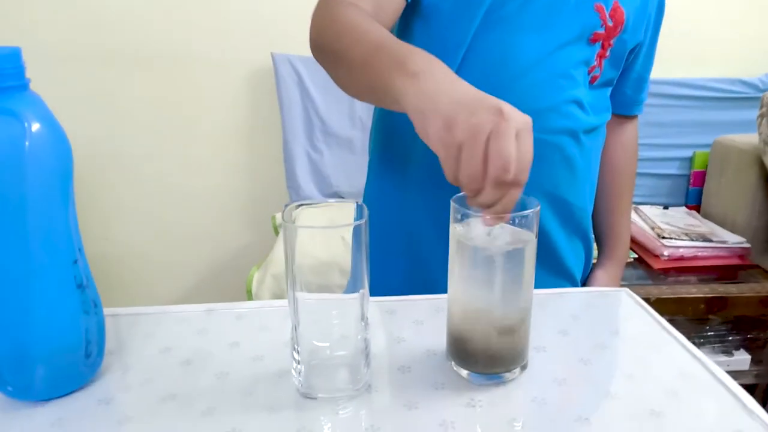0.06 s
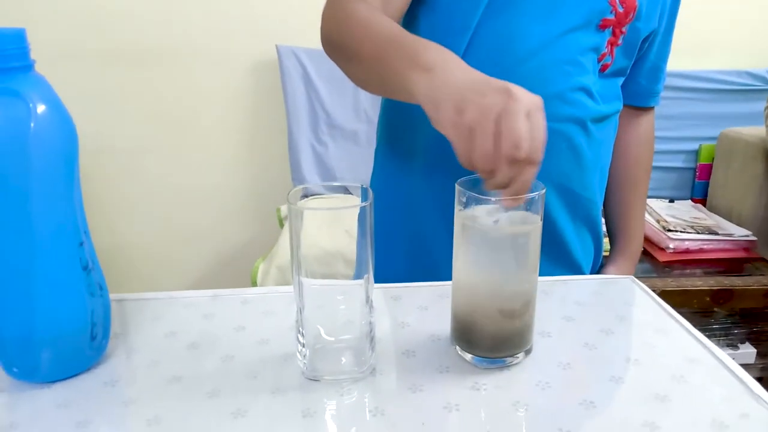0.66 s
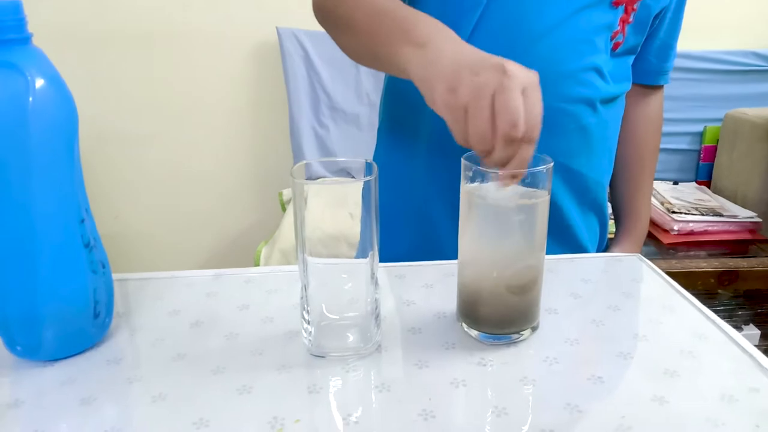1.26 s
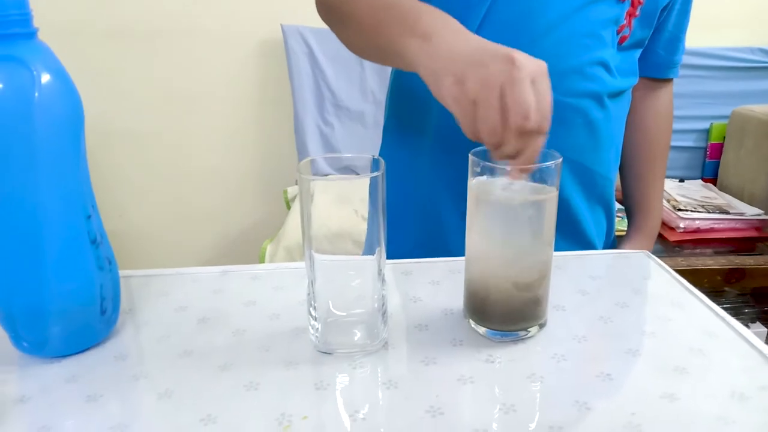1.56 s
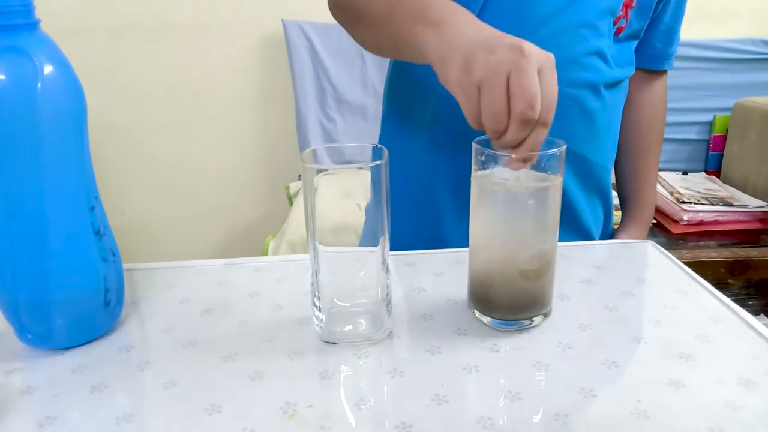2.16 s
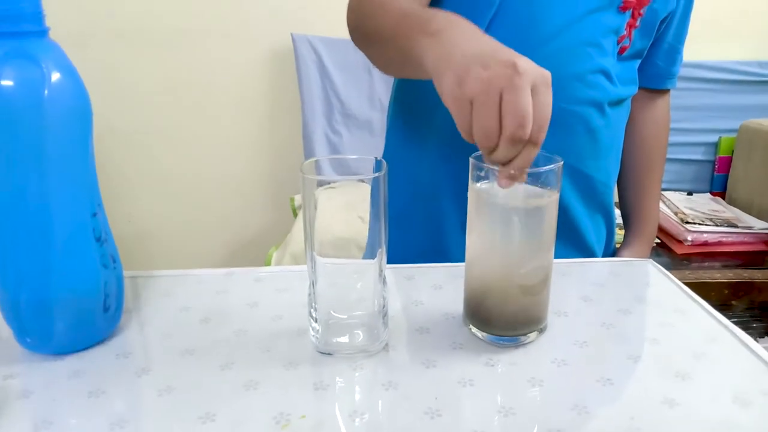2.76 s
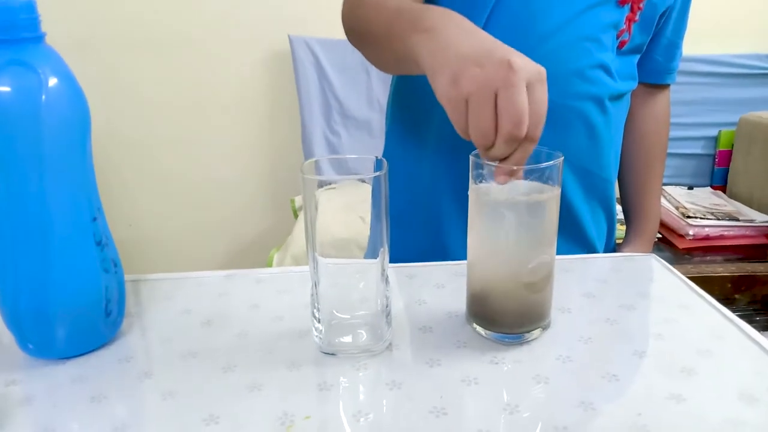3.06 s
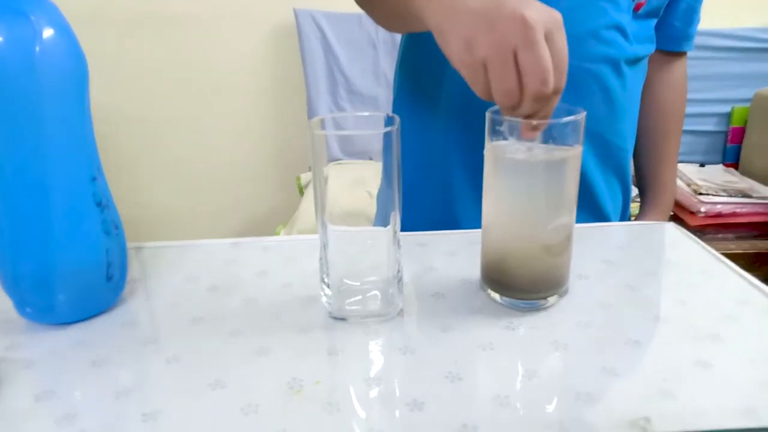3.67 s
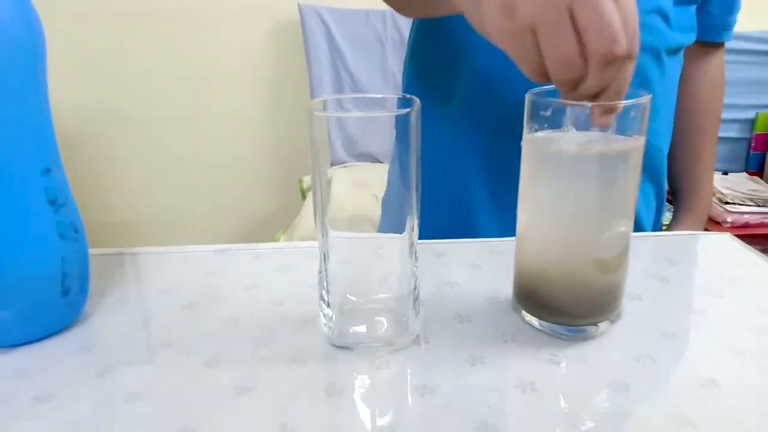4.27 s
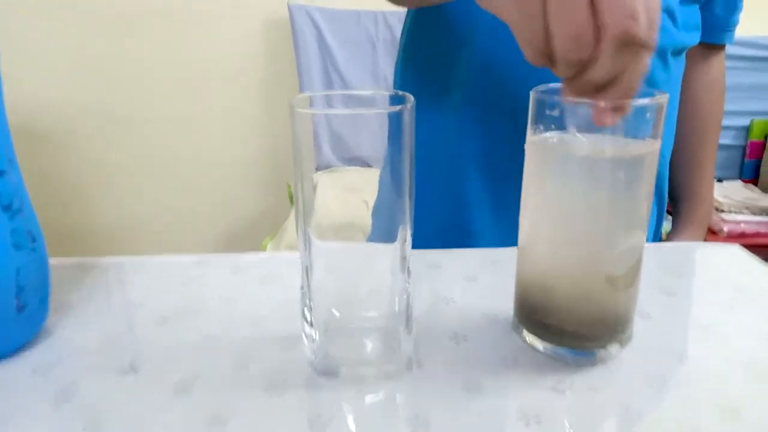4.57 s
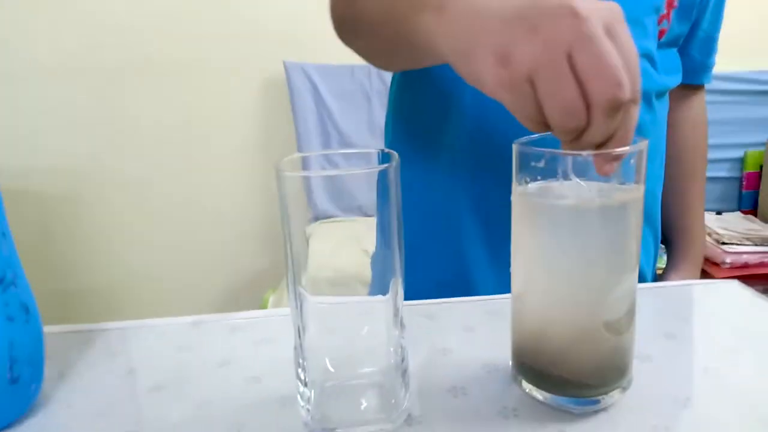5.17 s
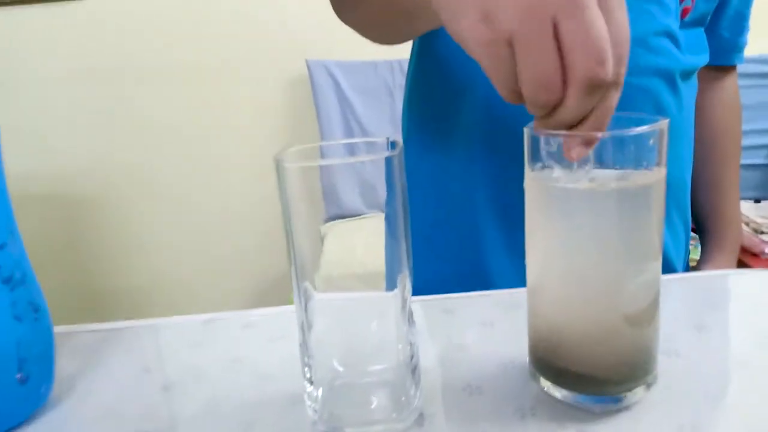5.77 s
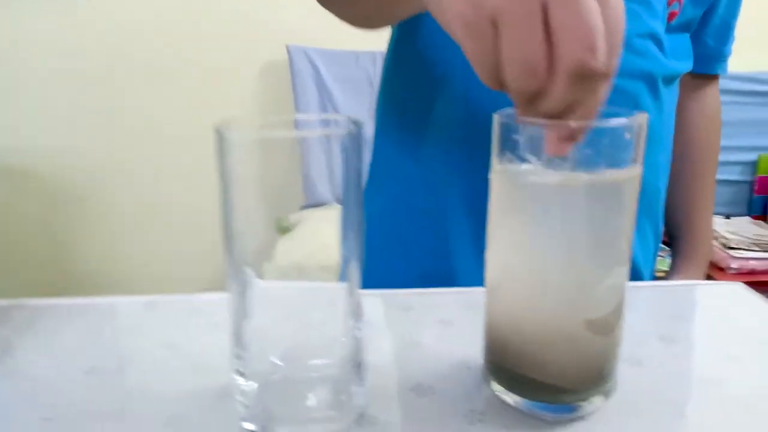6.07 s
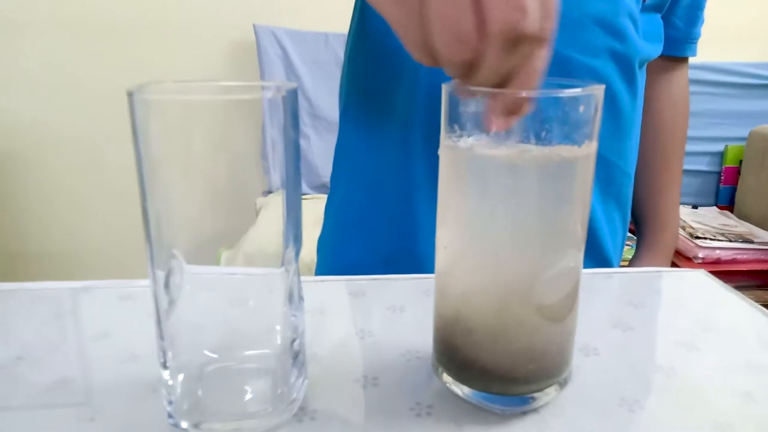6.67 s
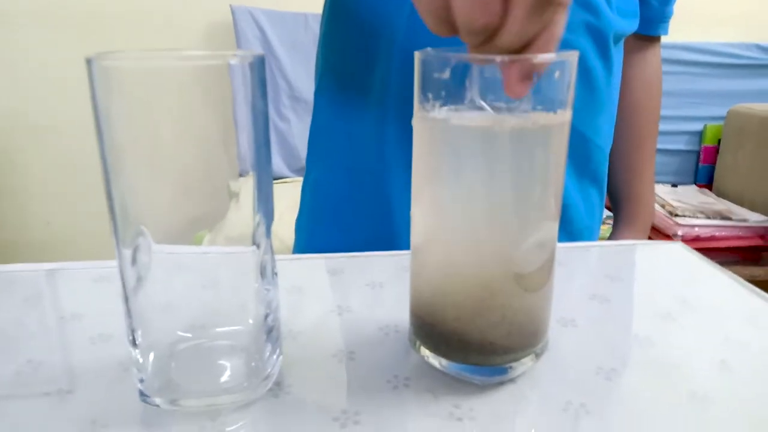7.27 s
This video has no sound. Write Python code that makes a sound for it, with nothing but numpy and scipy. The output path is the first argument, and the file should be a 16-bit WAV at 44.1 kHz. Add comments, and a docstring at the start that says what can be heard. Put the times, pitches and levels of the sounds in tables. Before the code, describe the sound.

Gritty crunches and light, irregular clinks come from a rod swirling sandy water in a glass while a fan hums steadily in a small room. Early on, the rod digs twice through the sand and something hard clacks twice. Midway, the nearby hand-held phone picks up dull bumps, the last one loud. The taps on the glass then grow busier over faint sloshing, and a third clack sounds near the end.

```python
"""Gritty crunches and clinks: a rod stirs sand and water in a drinking glass, close to a hand-held phone.
Friction on the grains gives trains of tiny impulses; these and the rod's taps excite the glass's modes.
The water sloshes softly. Something hard clacks three times, ringing a panel and a latch in a small room.
Short pulses give dull bumps and small taps: handling thumps on the phone, a faint tick and a soft knock.
A fan hums behind it all."""
import sys
import numpy as np
from scipy import signal
from scipy.fft import rfft, irfft
from scipy.io import wavfile
from scipy.ndimage import uniform_filter1d

SR = 44100
rng = np.random.default_rng(int(sys.argv[2]) if len(sys.argv) > 2 else 0)


def output_pcm(signal):
    """Save a mono or channel-first signal as 16-bit PCM at the path in sys.argv[1].

    Samples are clipped to [-1, 1] before scaling.
    """
    pcm = np.clip(np.atleast_2d(signal).T, -1, 1) * 32767
    wavfile.write(sys.argv[1], SR, np.round(pcm).astype(np.int16))


N = 327222
T = np.arange(N) / SR

# Levels are relative: each source applies its own gain. t60_s is the time to decay by 60 dB.
# spectrum of the fan's air noise: frequency_hz, density_db
FAN_SPECTRUM = [(25, -15), (50, -16), (85, 2), (140, 2), (230, 0.5), (330, -4), (500, -6), (750, -13),
                (1500, -13.5), (2800, -15.5), (5000, -27.5), (9000, -33), (15000, -36)]
# harmonics of the fan's motor: pitch_hz, level_db
MOTOR_HARMONICS = [(100.2, -57), (200.4, -80.5), (300, -66)]
# dull bumps and small taps: start_s, level_db, brightness_hz, creak_length_s, creak_db, thud_db
BUMPS_AND_TAPS = [(2.616, -36.5, 1200, 0.0055, 2, -25), (2.784, -29, 1500, 0.0056, -5, -16),
                  (3.772, -17, 760, 0.031, -9.5, -21), (3.81, -26.5, 497, .005, -12, -26),
                  (3.821, -21.5, 250, 0.012, -8, -20), (4.2363, -4.5, 730, 0.029, -1.5, -18),
                  (5.367, -31, 260, 0.0088, 5.5, -37)]
# impacts that form the three clacks: start_s, level_db, slide_s, corner_hz, latch_db, rattle_db
CLACK_IMPACTS = [(1.7293, -32.5, 0.016, 7000, -4, -13), (1.7737, -22.5, 0.0015, 2100, -20, -31),
                 (2.040, -29.5, 0.011, 7000, -3.5, -11), (2.0928, -18, 0.0011, 5400, -24, -12),
                 (6.002, -38.5, 0.019, 9000, -1, -7), (6.016, -35.5, 0.0022, 12000, -5, -10),
                 (6.0464, -26, 0.0051, 12000, -11, -32)]
# spectrum of a clack's knock: frequency_hz, density_db
CLACK_SPECTRUM = [(80, -15), (170, -9.5), (235, 0), (320, -4.5), (550, 5.5), (680, -9), (800, 0.5),
                  (1050, 1.5), (1600, -2.5), (2200, -4), (3100, -9.5), (4800, -12.5), (6200, -16.5),
                  (8000, -16), (15000, -35)]
# modes of the struck panel: pitch_hz, level_db, t60_s
PANEL_MODES = [(228.7, -14, 0.29), (475.6, -10.5, 0.12), (583, -9, 0.13), (835, 3.5, 0.019),
               (1065, 1.5, 0.044), (1500, -7, 0.061)]
# modes of the metal latch: pitch_hz, level_db, t60_s
LATCH_MODES = [(3086, 1.5, 0.031), (6170, -4, 0.027), (6360, -7, 0.038), (9600, -11, 0.0066),
               (13500, -2.5, 0.0037)]
# envelope of the swirling water: time_s, slosh_db, glass_tone_db
SWIRL_LEVELS = [(0, -53, -72), (.35, -52.5, -54), (.8, -57, -58.5), (1.1, -52, -63), (1.45, -57.5, -66),
                (2.4, -58.5, -67.5), (3.0, -60, -64.5), (3.8, -61, -72), (4.35, -58, -62),
                (4.85, -65.5, -66), (5.2, -61.5, -69), (5.9, -63.5, -62), (6.7, -70, -68),
                (7.4, -59, -67.5)]
# spectrum of the slosh: frequency_hz, density_db
SLOSH_SPECTRUM = [(200, -12), (380, -7.5), (570, 8.5), (700, -8), (900, 4), (1200, -9), (1800, 5),
                  (3000, -12.5), (6000, -10.5), (15000, -41)]
# lowest mode of the filled glass: pitch_hz, level_db, t60_s
LOWEST_MODE = (991, 0, 0.19)
# long-ringing mode of the rim: pitch_hz, level_db, t60_s
RIM_MODE = (2772, 0, 0.25)
# wall modes of the filled glass: pitch_hz, level_db, t60_s
WALL_MODES = [(1718, -15, 0.12), (2030, -12, 0.05), (2360, -4.5, 0.061), (2451, -10, 0.079),
              (2480, 1, 0.036), (2584, -6.5, 0.07), (2656, -4.5, 0.026), (2825, -11.5, 0.028),
              (3240, -0.5, 0.02), (3830, -10, 0.12), (5030, -10, 0.047), (5220, -11.5, 0.069),
              (5950, -20.5, 0.071), (7000, -9, 0.052), (7250, -8.5, 0.06), (8000, -25, 0.15),
              (8280, -9.5, 0.057), (9550, -22, 0.037), (11400, -18, 0.034), (11400, -30, .06),
              (13500, -21, 0.058)]
# quick digs through the sand: start_s, peak_s, level_db, swell_db, t60_s, rod_db, squeak_hz, squeak_db
SAND_SWISHES = [(.47, 0.518, -32.5, 9.5, 0.27, -8, 5000, -8), (0.773, 0.799, -35, 12, .25, 1, 14100, 2)]
# spectrum of rushing sand: frequency_hz, density_db
SWISH_SPECTRUM = [(300, -28), (900, 1), (1400, -3), (1900, -5), (3000, -15), (5000, 0), (8000, 4.5),
                  (12000, 1), (16000, 1.5)]
# modes of the scraping rod: pitch_hz, level_db, t60_s
ROD_MODES = [(950, -6, 0.026), (1610, 2.5, 0.022), (1830, -2, 0.026), (2080, -1.5, 0.06), (2780, -11, 0.18),
             (4980, 1.5, 0.04)]
# spectrum of cracking grit: frequency_hz, density_db
GRIT_SPECTRUM = [(300, 3.5), (900, -5.5), (1800, -5), (3000, -2.5), (5000, -1), (8000, -4.5),
                 (12000, -10.5), (16000, -4.5)]
# drags of the rod along the wall: start_s, length_s, grit_db, rub_db
ROD_STROKES = [(-.03, 0.038, -59, -41), (0.072, 0.23, -60.5, -46), (0.352, .05, -62, -47.5),
               (0.444, 0.46, -60, -45), (0.742, 0.34, -62.5, -48), (1.02, 0.19, -62, -45.5),
               (1.218, .1, -56, -65), (1.416, 0.23, -66.5, -54), (1.812, 0.17, -69, -49.5),
               (2.173, .12, -74, -46), (2.546, 0.072, -67.5, -53), (2.708, 0.095, -68.5, -55),
               (2.904, 0.07, -68.5, -50), (3.091, 0.033, -69, -48), (3.19, 0.036, -59, -43),
               (3.263, 0.043, -72, -49), (3.438, 0.058, -64.5, -46.5), (3.56, .09, -76, -59),
               (3.857, 0.16, -83, -52), (4.07, 0.062, -65, -59), (4.367, 0.25, -64.5, -47.5),
               (4.68, 0.3, -64.5, -45.5), (5.138, 0.15, -67.5, -48), (5.423, 0.17, -66.5, -49),
               (5.732, 0.21, -70, -47), (6.123, 0.13, -65, -53), (6.307, 0.13, -75, -52),
               (6.434, 0.2, -65.5, -49), (6.885, 0.1, -66.5, -49.5), (7.048, 0.21, -67, -45.5),
               (7.283, 0.067, -67, -46.5)]
# taps of the rod on the wall: start_s, clink_db, tick_db, rim_db
ROD_TAPS = [(0.0694, -45, -36, -69), (0.0982, -52, -46, -71), (0.3596, -50.5, -38, -70),
            (0.776, -45, -36, -55), (1.055, -55, -42, -47), (1.1262, -48.5, -41.5, -66),
            (1.2978, -70, -44, -78), (1.5762, -53, -46, -61), (2.4365, -52.5, -59, -70),
            (2.5707, -57, -43, -71), (2.7202, -60, -55, -72), (3.104, -60, -54, -61),
            (3.1958, -72, -40, -58), (3.4792, -57, -57, -67), (3.9006, -66, -49, -54),
            (4.2734, -49, -55, -60), (4.3473, -53, -44, -72), (4.3821, -62, -38, -56),
            (4.405, -57, -35, -56), (4.4216, -60, -43, -63), (4.47, -56, -49, -44.5),
            (4.534, -52, -43, -51), (4.556, -65, -33.5, -68), (4.725, -48, -51, -60),
            (4.7591, -46.5, -46, -57), (4.8414, -44.5, -40, -49), (4.892, -51, -47, -52.5),
            (4.9332, -45, -39.5, -54.5), (5.1648, -47.5, -50, -73), (5.4283, -43, -38.5, -47),
            (5.451, -44, -40, -63), (5.538, -38.5, -45, -67), (5.5727, -56, -46.5, -53),
            (5.7359, -45, -41, -55), (5.8046, -46.5, -45, -54), (5.8613, -43, -38, -40),
            (6.132, -50, -47, -59), (6.1694, -47.5, -56, -58), (6.2263, -50, -48, -50.5),
            (6.4472, -46.5, -57, -50.5), (6.5462, -47, -48, -47), (6.594, -47, -54, -51),
            (6.6386, -46, -52, -68), (6.9633, -43, -48, -49.5), (7.1995, -49, -44, -46),
            (7.2972, -60, -52, -54)]
# response of the phone's microphone: frequency_hz, gain_db
MICROPHONE_RESPONSE = [(3050, -0.5), (3300, -8), (3550, -18), (4400, -21.5), (5200, -13), (6200, -8.5),
                       (7100, -10.5), (7800, -18), (9400, -8.5), (9950, -13), (11500, -0.5), (12300, -7),
                       (13600, -4.5), (15500, -18)]

STROKE_ATTACK_S, STROKE_SAG_DB_PER_S, STROKE_RELEASE_T60_S = 0.011, 15, 0.22
IDLE_GRIT_DB, IDLE_RUB_DB = -80, -62  # between strokes
KNOCK_DB, KNOCK_PER_CLINK, KNOCK_PER_TICK = -26, 0.42, 0.37  # the knock grows with the blow, dB per dB
FIRST_CONTACT_DB = -2.5  # relative to the chatter that follows
CLINK_TILT_DB_PER_OCTAVE = 0.7  # a tap slightly favours the high modes
HELD_RIM_T60_S = 0.2  # the rod stays on the glass and damps it
BAND_LIMIT_HZ = 15600


def undb(db):
    """Decibels to amplitude ratio."""
    return 10 ** (np.asarray(db) / 20)


def unit(x):
    """Normalisation to rms 1."""
    return x / np.sqrt(np.mean(x ** 2))


def fade(t, t60):
    """Exponential decay, with full level before time zero."""
    return np.exp(-np.log(1000) * np.maximum(t, 0) / t60)


def rise(t, tau_s):
    """Exponential approach to full level."""
    return 1 - np.exp(-t / tau_s)


def add(out, start_s, x):
    """Superposition of x on out from start_s."""
    i = int(start_s * SR)
    out[i:i + len(x)] += x[:N - i]


def excite(force, response):
    """Convolution: a linear system's answer to a force, cut to the force's length."""
    return signal.fftconvolve(force, response)[:len(force)]


def colour(x, points, size=4096):
    """Minimum-phase filtering through (frequency_hz, gain_db) points."""
    hz, db = np.transpose(points)
    bins_hz = np.maximum(np.fft.rfftfreq(size, 1 / SR), 1)
    gain = undb(np.interp(np.log(bins_hz), np.log(hz), db))
    cepstrum = irfft(np.log(gain))
    cepstrum[1:size // 2] *= 2
    cepstrum[size // 2 + 1:] = 0
    return excite(x, irfft(np.exp(rfft(cepstrum))))


def butter(x, hz, kind, order=2):
    """Maximally flat low-, high- or band-pass filtering."""
    return signal.sosfilt(signal.butter(order, np.minimum(hz, SR / 2 - 1), kind, fs=SR, output="sos"), x)


def drift(rate):
    """Smooth random fluctuation, rms 1, from rate values a second."""
    hold = int(SR / rate)
    steps = np.repeat(rng.standard_normal(N // hold + 1), hold)
    return unit(uniform_filter1d(uniform_filter1d(steps, hold), hold)[:N])


def grains(n, rate, spread_db):
    """Shot noise, rms 1: on average rate impulses a second, of unequal size."""
    size = undb(spread_db * np.minimum(rng.exponential(size=n), 4))
    return unit((rng.random(n) < rate / SR) * size * rng.standard_normal(n))


def ring(modes, t, scatter_db):
    """Free vibration as a sum of damped modes; the place of contact favours some of them."""
    return sum(undb(db + scatter_db * rng.standard_normal()) * fade(t, t60)
               * np.sin(2 * np.pi * (hz * t + rng.random())) for hz, db, t60 in modes)


def wandering_bands(x, depth_db, rate):
    """Amplitude modulation: as the contact point wanders, each band swells and sinks on its own."""
    edges_hz = np.geomspace(400, 15000, 13)
    spectrum = rfft(x)
    band = np.searchsorted(edges_hz, np.fft.rfftfreq(N, 1 / SR))
    return unit(sum(irfft(spectrum * (band == k), N) * undb(depth_db * drift(rate))
                    for k in range(len(edges_hz) + 1)))


def room(x, wet_db, t60):
    """Reverberation: the diffuse tail of a small room follows the direct sound."""
    t = T[:SR // 2]
    tail = rng.standard_normal(len(t)) * fade(t, t60) * rise(t, 0.0086)
    return x + undb(wet_db) * excite(x, tail / np.linalg.norm(tail))


def fan():
    """Broadband air noise wavers gently over the harmonics of the motor."""
    air = unit(colour(rng.standard_normal(N), FAN_SPECTRUM)) * undb(-51.5 + 0.8 * drift(11))
    hum = sum(undb(db) * np.sqrt(2) * np.sin(2 * np.pi * hz * T + 0.15 * drift(3.9))
              for hz, db in MOTOR_HARMONICS)
    return air + hum


def bumps_and_taps():
    """Impact transients (handling thumps, a faint tick, a soft knock): pulse, thud, stick-slip creak."""
    out, t = np.zeros(N), T[:SR // 10]
    for start_s, db, brightness_hz, creak_length_s, creak_db, thud_db in BUMPS_AND_TAPS:
        pulse_time = 2 * np.pi * brightness_hz * t
        pulse = -pulse_time * np.exp(1 - pulse_time)
        thud = np.sin(2 * np.pi * 105 * t) * fade(t - 0.012, t60=0.044)
        slips = np.zeros(len(t))
        slip_s = np.cumsum(rng.uniform(0.0008, 0.003, 30))
        taper = np.maximum(1 - (slip_s / creak_length_s) ** 2, 0)
        slips[(slip_s * SR).astype(int)] = -undb(3 * rng.standard_normal(30)) * taper
        hiss = butter(rng.standard_normal(len(t)), [1500, 5000], "bandpass", order=1)
        snap = fade(t, t60=0.00059) + 0.35 * hiss * fade(t, t60=0.013)
        creak = butter(excite(slips, snap), 9 * brightness_hz, "lowpass", order=1)
        add(out, start_s, undb(db + 2.0) * (pulse + undb(creak_db) * creak + undb(thud_db) * thud))
    return butter(out, 86, "highpass", order=3)


def clacks():
    """Impact excitation: a hard part slides and snaps home, ringing panel and latch, then rattles."""
    out, t = np.zeros(N), T[:SR // 2]
    for start_s, db, slide_s, corner_hz, latch_db, rattle_db in CLACK_IMPACTS:
        blow = rng.standard_normal(len(t)) * fade(t - slide_s, t60=0.038) * rise(t, slide_s / 2)
        room_tail = rng.standard_normal(len(t)) * fade(t, t60=0.3) * rise(t, 0.0058)
        knock = colour(undb(11.5) * blow + undb(4.0) * room_tail, CLACK_SPECTRUM)
        panel = undb(1.0) * ring(PANEL_MODES, t, scatter_db=-0.5)
        metal = ring(LATCH_MODES, t, scatter_db=-2.5)
        latch = excite(blow + undb(-8) * room_tail, metal / np.linalg.norm(metal))
        rattle = unit(butter(grains(len(t), rate=2700, spread_db=5.5), [1300, 3200], "bandpass", order=1))
        rattle *= np.minimum(t / 0.017, 1) * fade(t - 0.03, t60=0.21)
        body = butter(knock + panel + undb(rattle_db) * rattle, corner_hz, "lowpass", order=1)
        add(out, start_s, undb(db) * (body + undb(latch_db) * latch))
    return butter(out, 76, "highpass")


def water():
    """Resonance: the gurgling swirl drags sand round the wall, driving the lowest mode of the glass."""
    time_s, slosh_db, tone_db = np.transpose(SWIRL_LEVELS)
    slosh = colour(grains(N, rate=700, spread_db=1.5), SLOSH_SPECTRUM)
    slosh = wandering_bands(slosh, depth_db=3.5, rate=22)
    sand = grains(N, rate=440, spread_db=4.0)
    tone = unit(excite(sand, ring([LOWEST_MODE], T[:SR // 2], scatter_db=0)))
    return slosh * undb(np.interp(T, time_s, slosh_db)) + tone * undb(np.interp(T, time_s, tone_db))


def sand_swishes():
    """Granular flow: as the rod digs in, a rush of grains swells and dies, rings the rod and squeaks."""
    out, t = np.zeros(N), T[:SR // 2]
    for start_s, peak_s, db, swell_db, t60, rod_db, squeak_hz, squeak_db in SAND_SWISHES:
        rush = grains(len(t), rate=7100, spread_db=0.0)
        sand = unit(colour(rush, SWISH_SPECTRUM))
        rod = unit(excite(rush, ring(ROD_MODES, t, scatter_db=2.5)))
        squeak = unit(butter(rush, [squeak_hz * 0.975, squeak_hz * 1.025], "bandpass", order=1))
        swell_s = peak_s - start_s
        push = undb(swell_db * np.minimum(t / swell_s - 1, 0)) * fade(t - swell_s, t60)
        add(out, start_s, undb(db) * push * (sand + undb(rod_db) * rod + undb(squeak_db) * squeak))
    return out


def stroke_pressure(start_s, length_s):
    """Contact pressure in one stroke: the rod presses on, eases off along the wall and lets go."""
    t = T - start_s
    attack = np.clip(t / STROKE_ATTACK_S, 0, 1)
    sag = undb(-STROKE_SAG_DB_PER_S * np.clip(t, 0, length_s))
    return attack * sag * fade(t - length_s, STROKE_RELEASE_T60_S)


def stirring():
    """Friction: sand grains crack between rod and glass, and their impulses keep the wall ringing."""
    grit_power, rub_power = undb(IDLE_GRIT_DB) ** 2, undb(IDLE_RUB_DB) ** 2
    for start_s, length_s, grit_db, rub_db in ROD_STROKES:  # incoherent sounds add in power
        pressure = stroke_pressure(start_s, length_s)
        grit_power += (pressure * undb(grit_db)) ** 2
        rub_power += (pressure * undb(rub_db)) ** 2
    grit = colour(grains(N, rate=900, spread_db=1.5), GRIT_SPECTRUM)
    grit = wandering_bands(room(grit, wet_db=1.5, t60=0.21), depth_db=2.5, rate=30)
    rubbing = grains(N, rate=900, spread_db=-1.5) * np.sqrt(rub_power)
    rim_hz, _, rim_t60 = RIM_MODE
    glass = ring(WALL_MODES + [(rim_hz, -8, rim_t60)], T[:SR // 2], scatter_db=0.9)
    ringing = excite(rubbing, glass / np.linalg.norm(glass))
    return undb(10.5) * grit * np.sqrt(grit_power) + undb(-6.0) * ringing


def rod_taps():
    """Modal response to impact: the rod hits and chatters, giving a tick, knock, clink and rim tone."""
    ticks, tones, t = np.zeros(N), np.zeros(N), T[:SR // 4]
    rim_hz, rim_mode_db, _ = RIM_MODE
    wall = np.array([ring([(hz, db + CLINK_TILT_DB_PER_OCTAVE * np.log2(hz / rim_hz), t60)], t, 0)
                     for hz, db, t60 in WALL_MODES])
    for start_s, clink_db, tick_db, rim_db in ROD_TAPS:
        chatter = grains(len(t), rate=4000, spread_db=2.5) * fade(t, t60=0.1) * rise(t, 0.0017)
        strike = rng.standard_normal(len(t)) * fade(t, t60=0.01) * rise(t, 0.00066)
        contact = unit(unit(chatter) + undb(FIRST_CONTACT_DB) * unit(strike))
        # each place of contact picks its own few of the dense high modes
        high_modes = [(hz, 0, 0.05) for hz in rng.uniform(4800, 15000, 14)]
        shimmer = ring(high_modes, t, scatter_db=4) * rise(t, 0.0019)
        tick = undb(-16.5) * contact + undb(-10.5) * shimmer
        knock = unit(butter(contact, [450, 2600], "bandpass"))  # the dull sound of the rod itself
        knock_db = KNOCK_DB + KNOCK_PER_CLINK * clink_db + KNOCK_PER_TICK * tick_db
        add(ticks, start_s, undb(tick_db) * tick + undb(knock_db) * knock)
        mode_gains = undb(3.9 * rng.standard_normal(len(wall)))
        clink = unit(excite(contact, mode_gains @ wall))
        rim = ring([(rim_hz, rim_mode_db, HELD_RIM_T60_S)], t, scatter_db=2.0) * rise(t, 0.005)
        add(tones, start_s, undb(clink_db - 13.0) * clink + undb(rim_db + 7.5) * rim)
    return room(colour(ticks, GRIT_SPECTRUM), wet_db=-5.5, t60=0.31) + tones


def scene():
    """Superposition of all sources; the level dips briefly just after one second."""
    mix = stirring() + water() + rod_taps() + sand_swishes() + clacks() + bumps_and_taps() + fan()
    dip_db = np.interp(T, [1.146, 1.15, 1.225, 1.3], [-1.5, -22.0, -10.5, 0.5])
    return (mix * undb(dip_db))[None]


def record(dry):
    """Frequency response: the phone's microphone is flat up to 3 kHz, weak and uneven above it."""
    band_limit = signal.ellip(8, 0.2, 70, BAND_LIMIT_HZ, fs=SR, output="sos")
    return signal.sosfilt(band_limit, colour(dry[0], MICROPHONE_RESPONSE))[None]


dry = scene()
out = record(dry)
output_pcm(out)
```